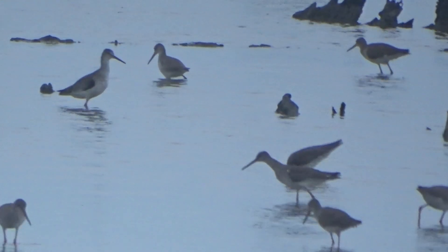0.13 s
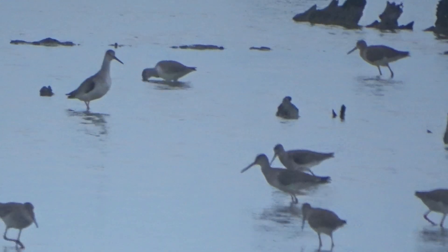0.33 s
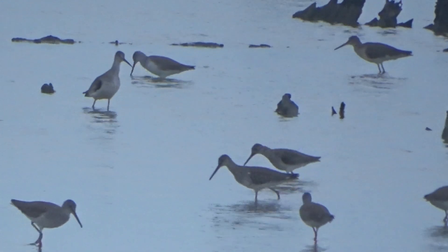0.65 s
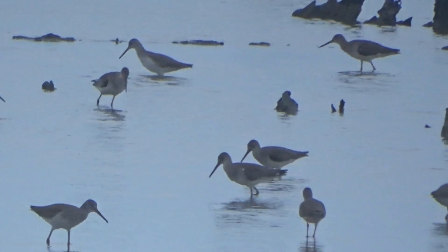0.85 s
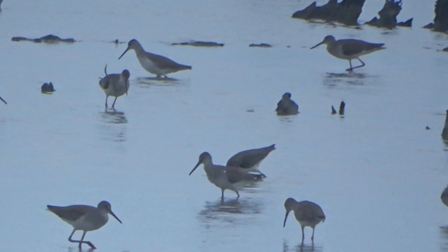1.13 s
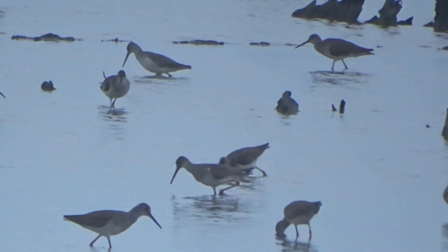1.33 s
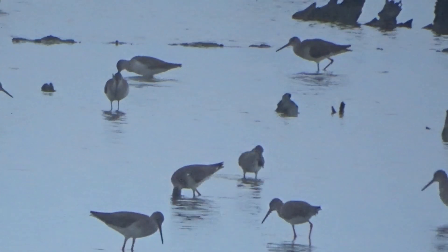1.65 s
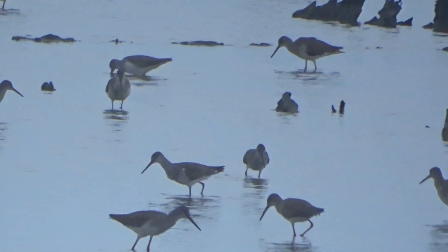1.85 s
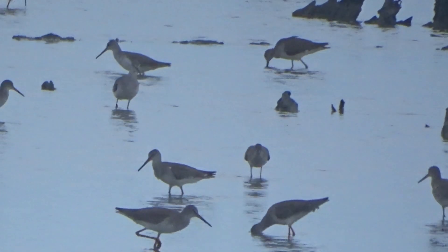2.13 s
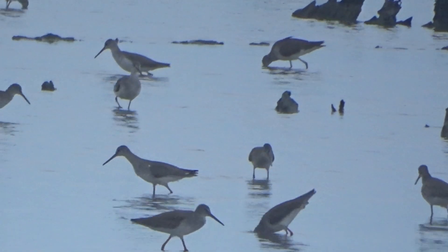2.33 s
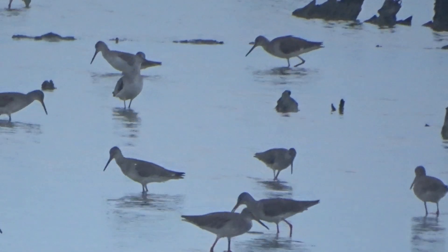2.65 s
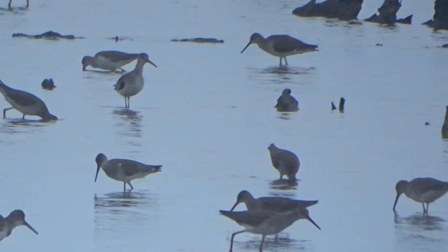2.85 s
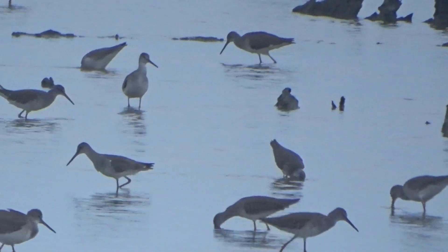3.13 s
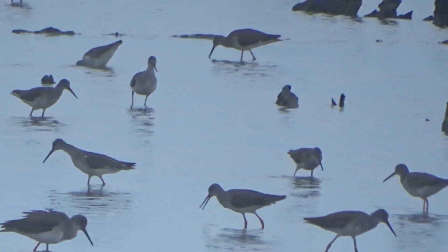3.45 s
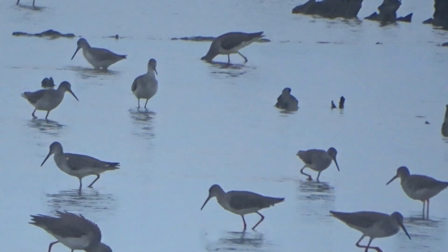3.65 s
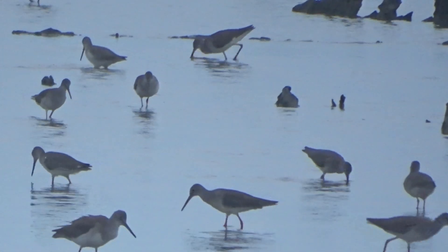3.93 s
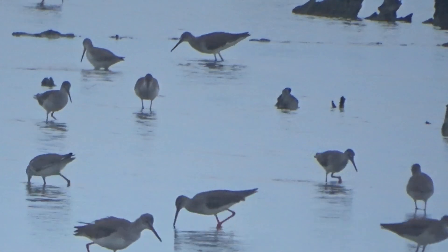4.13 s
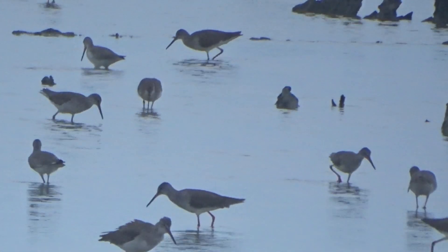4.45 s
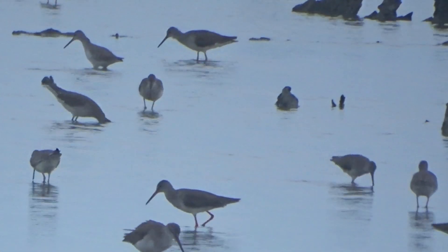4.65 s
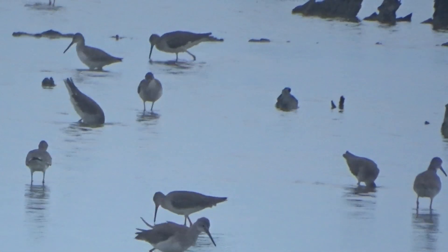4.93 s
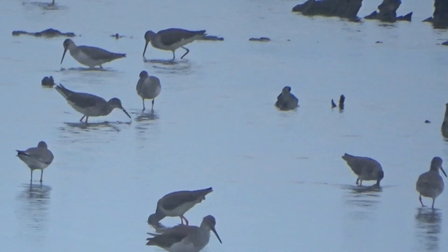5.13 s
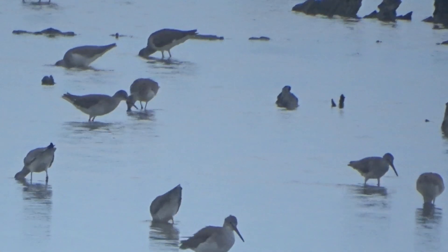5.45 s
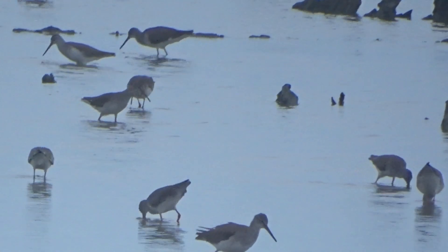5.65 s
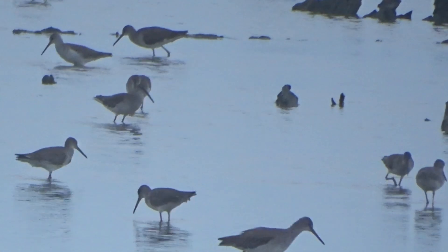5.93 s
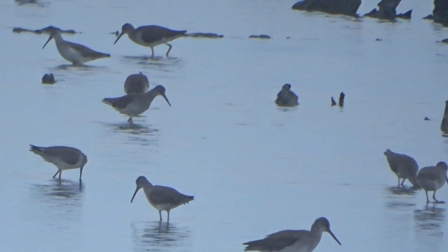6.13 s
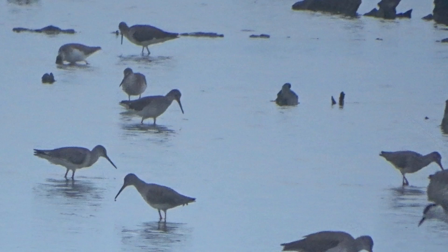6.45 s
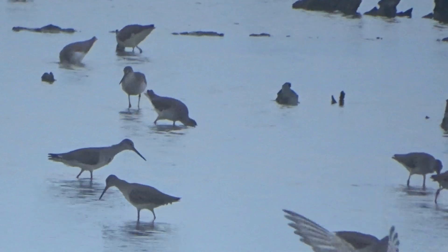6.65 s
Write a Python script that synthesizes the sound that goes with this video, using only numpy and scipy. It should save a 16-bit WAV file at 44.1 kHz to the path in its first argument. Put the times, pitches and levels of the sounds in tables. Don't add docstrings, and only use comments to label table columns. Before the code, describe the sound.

Shorebirds feed on a calm tidal flat, heard through a handheld camera with airy hiss, low wind rumble and a very faint high insect drone. From 0 s, soft far whistles mix with quick near trills and chirps around 3 kHz, slightly left. Bright plastic snaps strike at 0.4, 1.1-1.3 and 1.55 s, with rubbing between. A piping call and a falling whistle come at 1.0 s; harsh squeals at 1.5 and, strongest, 2.35-2.45 s. Piping repeats at 2.3 and 3.0 s, while a thin high song sweeps upward between 1.1 and 3.7 s. Wind eases near 3 s. A clear whistle drops at 4.35 s, another pipe sinks at 4.55 s amid clicks and knocks, as far trilling peaks. A bright trill comes around 5.05 s; after 5.6 s the chatter falls away, leaving sparse chirps, faint whistles and light rubbing until about 6.8 s.

```python
import sys
import numpy as np
from scipy import signal
from scipy.io import wavfile
from scipy.ndimage import uniform_filter1d

SR = 44100
rng = np.random.default_rng(int(sys.argv[2]) if len(sys.argv) > 2 else 0)


def to_wav(s):
    ch = np.atleast_2d(s).T
    pcm = np.round(np.clip(ch, -1, 1) * 32767)
    wavfile.write(sys.argv[1], SR, pcm.astype(np.int16))


def invert_db(level):
    return 10 ** (np.asarray(level, dtype=float) / 20)


N = 298998


def rms_one(x):
    return x / np.sqrt(np.mean(x ** 2) + 1e-20)


def in_time(rows):
    s, *columns = np.transpose(rows)
    return [np.interp(np.arange(N) / SR, s, column) for column in columns]


def at_hz(points, hz):
    point_hz, level_db = np.transpose(points)
    return np.interp(np.log(hz), np.log(point_hz), level_db)


def drift(rate_hz):
    r = np.exp(-2 * np.pi * rate_hz / SR)
    wander = signal.lfilter([1], [1, -2 * r, r * r], rng.standard_normal(N + SR))
    return rms_one(wander[SR:])


def pan(x, left_db):
    return x * invert_db(np.array([[.5], [-.5]]) * left_db)


def resonance(x, hz, width_hz):
    r = np.exp(-np.pi * width_hz / SR)
    zeros = np.array([1, 0, -1]) * (1 - r * r) / 2
    return signal.lfilter(zeros, [1, -2 * r * np.cos(2 * np.pi * hz / SR), r * r], x)


def band_20_70(x):
    return signal.sosfilt(signal.butter(2, [20, 70], "band", fs=SR, output="sos"), x)


def banded_noise(spectrum, patchy_db, alike_share):
    # f/Hz, likeness [0-1]
    likeness = [(60, 1), (200, 0.93), (500, 0.032), (2000, 0.44), (9000, 0.62)]
    out, edges = 0, np.geomspace(40, 13000, 22)
    edges = edges[edges > spectrum[0][0]]
    white, flicker = rng.standard_normal((2, 2, N)), drift(16.0)
    for k, (low, high) in enumerate(zip(edges, edges[1:])):
        band = signal.butter(2, [low, high], "band", fs=SR, output="sos")
        mid, side = signal.sosfilt(band, white[k % 2])
        hz = np.sqrt(low * high)
        alike = np.clip(max(at_hz(likeness, hz), alike_share), 0, 1)
        gain = invert_db(at_hz(spectrum, hz) + patchy_db * np.roll(flicker, k * SR // 3))
        out = out + gain * (np.sqrt(1 + alike) * mid + np.sqrt(1 - alike) * side * [[1], [-1]])
    return rms_one(out)


def open_flat(x):
    t = np.arange(int(.15 * SR)) / SR
    tails = rng.standard_normal((2, len(t))) * invert_db(-60 * t / 0.19) * (t > .004)
    tails = tails / np.sqrt(np.sum(tails ** 2) / 2)
    return signal.fftconvolve(x[None], tails, axes=1)[:, :N]


def add(out, s, pitch_hz, height, overtones, start):
    i = int(s * SR)
    phase = start + 2 * np.pi * np.cumsum(pitch_hz) / SR
    tone = np.sin(phase)
    for multiple, db in overtones:
        tone = tone + invert_db(db) * np.sin(round(4 * multiple) / 4 * phase)
    out[i:i + len(tone)] += (np.sqrt(2) * height * tone)[:N - i]


def bent(rows, arch=0, sag=0):
    notes = []
    for s, ms, first, last, db in rows:
        middle = (first + last) / 2 * (1 + arch) - sag * abs(last - first)
        notes.append((s, ms, first, middle, last, db))
    return notes


def glides(rows, overtones, edge, waver=0 * np.arange(N)):
    out, starts = np.zeros(N), rng.uniform(0, 2 * np.pi, len(rows))
    for (s, ms, first, middle, last, level_db), start in zip(rows, starts):
        u = np.linspace(-1, 1, int(ms * SR / 1000))
        pitch = middle + (last - first) / 2 * u + ((first + last) / 2 - middle) * u ** 2
        shake = waver.take(int(s * SR) + np.arange(len(u)), mode="wrap")
        swell = signal.windows.tukey(len(u), np.clip(edge, 0, 1))
        add(out, s, pitch * (1 + shake), invert_db(level_db) * swell, overtones, start)
    return out


def trill(rows, rise_ms, fall_ms, tail_db):
    out = np.zeros(N)
    ms = np.arange(-rise_ms, fall_ms + 16, 1000 / SR)
    rise = np.cos(np.pi / 2 * ms / rise_ms)
    fall = np.cos(np.pi / 2 * np.minimum(ms / fall_ms, 1)) ** 2
    swell = np.where(ms < 0, rise, fall)
    slack = np.maximum(ms - 0.61 * fall_ms, 0)
    tail = invert_db(tail_db) * np.sin(np.pi * slack / slack[-1])
    for (s, hz, slope, db), (start, depth) in zip(rows, rng.random((len(rows), 2))):
        tense = np.clip((hz - 3150) / 400, .4, 1)
        pitch = hz + slope * (ms - slack) - (15 + 25 * depth) * slack
        height = invert_db(db) * (swell + tail * depth * tense)
        add(out, s - rise_ms / 1000, pitch, height, [(2, -28)], 2 * np.pi * start)
    return out


def far_whistles():
    # t/s, length/ms, start f/Hz, end f/Hz, level/dB
    arched = [(0, 30, 1850, 1600, -53), (0.015, 52, 2400, 2130, -50.5), (0.085, 35, 2950, 2750, -60),
              (0.1, 104, 1740, 1600, -52.5), (0.205, 38, 2480, 2220, -61), (0.31, 25, 2430, 2220, -59),
              (0.452, 64, 1600, 1580, -57.5), (0.49, 24, 2450, 2350, -57), (0.645, 100, 1520, 1540, -63),
              (0.755, 110, 1500, 1440, -65), (1.3, 80, 1480, 1470, -61), (1.41, 120, 1430, 1470, -60),
              (1.53, 110, 1450, 1440, -60), (1.7, 110, 1420, 1460, -61), (1.82, 140, 1460, 1470, -59),
              (1.96, 50, 1720, 1680, -62), (2.07, 95, 1450, 1530, -59), (2.07, 90, 2220, 2180, -63),
              (2.175, 95, 1480, 1420, -60), (2.18, 85, 1280, 1150, -65), (2.435, 140, 1360, 1450, -61),
              (2.68, 38, 1480, 1400, -65), (2.74, 120, 1350, 1460, -63), (2.765, 215, 1880, 1700, -62),
              (3.33, 90, 1130, 1130, -67), (3.355, 90, 1600, 1450, -61), (3.5, 85, 1380, 1400, -61),
               (3.52, 60, 1150, 1130, -68), (3.65, 50, 1520, 1550, -63), (3.655, 40, 2320, 2200, -64),
               (3.74, 80, 1450, 1700, -63), (4.05, 90, 1500, 1450, -64), (5.64, 40, 1760, 1660, -67),
               (5.78, 36, 1080, 1130, -64), (5.83, 70, 1980, 2200, -70), (5.865, 20, 1120, 1120, -67),
               (5.9, 30, 1090, 1110, -65), (5.99, 92, 1720, 1690, -66), (6.02, 55, 3420, 3380, -71),
               (6.06, 130, 1450, 1480, -67), (6.112, 112, 1085, 1080, -64), (6.18, 30, 2900, 3120, -65),
               (6.2, 55, 2050, 1830, -68), (6.22, 35, 2880, 2950, -66), (6.26, 40, 1680, 1660, -68),
               (6.32, 140, 1680, 1560, -67), (6.365, 115, 1085, 1080, -64), (6.51, 75, 3200, 3380, -68),
               (6.52, 90, 1480, 1440, -67), (6.625, 100, 2950, 3230, -64), (6.71, 30, 2650, 2850, -66)]
    # t/s, length/ms, start f/Hz, end f/Hz, level/dB
    sagging = [
        (1.655, 147, 3080, 3153, -52.5),
        (1.795, 71, 3180, 2220, -58.5),
        (1.858, 104, 3360, 3280, -51),
        (2.72, 40, 2640, 2300, -58),
        (4.485, 79, 2526, 2395, -48),
        (5.948, 29, 3500, 3660, -56.5),
        (5.97, 29, 3400, 2670, -51),
        (6.0, 25, 2610, 3230, -52),
    ]
    repeats = [(5.17 + .19 * k, 72, 1790, 1850, -66) for k in range(4)]
    notes = bent(arched + repeats, arch=0.0397) + bent(sagging, sag=0.236)
    return glides(notes, [], .35, waver=.008 * drift(50.0)) * invert_db(1.5 * drift(40.0))


def far_flock(count, low_hz, high_hz, ms):
    s, p, size, place = rng.random((count, 4)).T
    hz = low_hz + (high_hz - low_hz) * p ** 2
    rows = np.transpose([s * (N / SR), ms * (.5 + size), .95 * hz, hz, 0.913 * hz, 2.6 * size])
    waver = .012 * drift(70.0)
    left = glides(rows[place < .5], [], .8, waver)
    middle = glides(rows[place >= .5], [], .8, waver)
    return rms_one(pan(left, 15.0) + middle + invert_db(0.5) * open_flat(left + middle))


def far_trills(count, low_hz, high_hz):
    s, p, size, pace = rng.random((count, 4)).T
    beats = np.arange(3)[:, None]
    s = (np.arange(count) + s) / count
    at = .02 + (s * (N / SR) + beats * (.026 + 0.014 * pace)) % (N / SR - .05)
    hz = low_hz + (high_hz - low_hz) * p - 60.0 * beats
    rows = np.stack(np.broadcast_arrays(at, hz, -8.0 - 40.0 * pace, 8.0 * size), -1)
    chatter = trill(rows.reshape(-1, 4), rise_ms=4.4, fall_ms=12.1, tail_db=-7.0)
    return rms_one(pan(chatter, 4.3) + invert_db(-5.5) * open_flat(chatter))


def wind(gust_db):
    gusts = band_20_70(rng.standard_normal((2, N)) + 1.2 * rng.standard_normal(N))
    return invert_db(gust_db - 5.5 + 4.5 * drift(7.0)) * rms_one(gusts)


def insects():
    noise = rng.standard_normal((2, N))
    return invert_db(-81.0) * rms_one(resonance(resonance(noise, 6560, 440), 6560, 440))


def air():
    # f/Hz, level/dB per Hz
    air_spectrum = [(35, -37), (60, 1.5), (192, -1), (256, -12.5), (452, -12), (818, -25), (1510, -17.5),
                    (2200, -29), (3050, -14), (4340, -35), (6580, -28), (10400, -37.5), (11400, -31),
                    (14800, -75), (22000, -120)]
    return invert_db(-53.5) * pan(banded_noise(air_spectrum, patchy_db=2.5, alike_share=0), .8)


def strokes(rows):
    out = np.zeros(N)
    for s, ms, db in rows:
        i, n = max(int((s - ms / 8000) * SR), 0), int(ms * SR / 800)
        out[i:i + n] += invert_db(db) * signal.windows.tukey(n, .55)[:N - i]
    return out


def rustle():
    # t/s, length/ms, level/dB
    rubbing = [(0, 77, -53.5), (0.1, 560, -63.5), (0.4, 41, -47), (0.47, 98, -48), (0.85, 100, -53),
               (0.94, 84, -56), (1.05, 460, -53), (1.58, 71, -52), (1.69, 51, -53.5), (1.82, 170, -61),
               (2.165, 37, -44.5), (3.06, 35, -53.5), (3.33, 110, -57), (3.52, 110, -54.5),
               (3.73, 76, -60.5), (3.94, 132, -55), (4.13, 64, -59), (4.54, 184, -53), (6.27, 200, -55),
               (6.58, 110, -67)]
    # f/Hz, level/dB per Hz
    rub_spectrum = [(2000, -2), (4000, 0), (7000, 7), (9500, 5.5), (11500, 2.5)]
    noise = banded_noise([(1000, -31)] + rub_spectrum, patchy_db=2.0, alike_share=0.86)
    return strokes(rubbing) * noise * invert_db(2.0 * drift(25.0) - 3.5)


def run_notes(runs, beat_s, glide):
    notes = []
    for first, last, first_hz, last_hz, db in runs:
        count = round((last - first) / beat_s) + 1
        bend, size = rng.standard_normal((count, 2)).T
        times = np.linspace(first, last, count)
        pitches = np.linspace(first_hz, last_hz, count)
        notes += zip(times, pitches, glide + 5.0 * bend, db + 2.0 * size)
    return notes


def near_trills():
    # first note t/s, last note t/s, first f/Hz, last f/Hz, level/dB
    quick = [(.017, .046, 3500, 3400, -43), (.947, 1.028, 3710, 3680, -49), (1.066, 1.18, 3570, 3470, -50),
             (2.048, 2.079, 2900, 3100, -51.5), (2.66, 2.798, 3530, 3660, -52.5),
             (2.897, 2.978, 3720, 3570, -48), (3.174, 3.234, 3640, 3640, -44),
             (3.38, 3.454, 3730, 3640, -45), (3.485, 3.512, 3570, 3550, -47),
             (3.533, 3.553, 3260, 3190, -45), (3.688, 3.767, 3526, 3610, -48.5),
             (3.801, 3.829, 3650, 3450, -52), (4.195, 4.222, 3560, 3650, -49),
             (4.418, 4.503, 3520, 3550, -51), (5.04, 5.096, 3710, 3530, -43.5)]
    steady = [(1.375, 1.48, 3529, 3520, -46.5), (1.34, 1.445, 3250, 3310, -50.5),
              (1.775, 1.91, 3610, 3530, -49), (1.633, 1.76, 3030, 3173, -44.5),
              (2.111, 2.209, 2820, 2930, -51), (2.117, 2.192, 3600, 3470, -50.5),
              (2.594, 2.629, 3720, 3730, -46), (3.045, 3.244, 3140, 3225, -46.5),
              (4.053, 4.088, 3220, 3110, -50), (4.438, 4.503, 3160, 3120, -46.5),
              (4.566, 4.666, 3110, 2960, -50.5), (4.726, 4.795, 3300, 3200, -63)]
    slow = [
        (1.847, 1.93, 3180, 3170, -57),
        (2.978, 3.024, 3300, 3670, -46.5),
        (3.432, 3.474, 3050, 3220, -49),
        (5.16, 5.36, 3240, 3110, -49),
        (5.4, 5.485, 2960, 2770, -59),
        (6.5, 6.62, 2990, 3120, -56),
        (6.702, 6.745, 3130, 3220, -54.5),
    ]
    # loudest moment t/s, f/Hz, glide/Hz per ms, level/dB
    chirps = [(0.293, 3280, -16, -51), (0.38, 3400, -20, -49.5), (0.507, 3310, -13, -43.5),
              (0.571, 3330, -39, -47), (0.636, 3220, -37, -47.5), (0.702, 3370, -21, -49),
              (0.785, 3250, -54, -50), (1.104, 3420, -1, -47), (1.265, 3440, 4, -47),
              (1.304, 3070, -47, -46.5), (1.589, 3130, -32, -41.5), (1.803, 3150, -28, -48),
              (1.963, 3070, 31, -45.5), (2.249, 3540, -2, -46.5), (2.307, 3520, -17, -46.5),
              (2.658, 3290, -37, -45), (2.889, 3190, -26, -45), (3.322, 3170, -7, -42),
              (3.603, 3080, 20, -47), (4.166, 3120, 5, -46.5), (4.25, 3280, 8, -45),
              (4.306, 3160, -11, -48.5), (4.902, 3270, -3, -47), (4.998, 3590, 2, -42.5),
              (5.113, 3045, -23, -46), (5.647, 3130, 7, -53), (5.84, 3300, -33, -58),
              (5.915, 3090, -15, -54.5), (6.137, 3060, -15, -51.5), (6.467, 3620, -22, -58.5),
              (0.115, 3480, -49, -57), (0.143, 3350, -35, -53), (0.2, 3300, -42, -58),
                   (0.459, 3190, -23, -46.5), (0.556, 3320, -4, -50), (0.611, 3270, -4, -51),
                   (0.66, 3240, -16, -51), (1.2, 3600, -19, -49), (1.315, 3720, 0, -56),
                   (1.514, 3260, -30, -43), (2.854, 3350, -31, -52), (4.835, 3310, -42, -59),
                   (4.959, 3100, -27, -55), (4.982, 3470, 5, -52), (5.004, 3090, -29, -48),
                   (5.51, 3170, -41, -62), (5.575, 2900, -23, -57), (5.853, 3120, -35, -58),
                   (6.021, 3070, -37, -55), (6.31, 2820, -50, -64), (6.38, 2850, -30, -58),
                   (6.446, 2950, -40, -58), (6.68, 3250, -33, -67)]
    crisp = chirps
    crisp = crisp + run_notes(quick, beat_s=.028, glide=-6.0) + run_notes(slow, beat_s=.041, glide=-24.0)
    drawn = run_notes(steady, beat_s=.034, glide=-7.0)
    crisp_trill = trill(crisp, rise_ms=6.0, fall_ms=15.0, tail_db=-6.0)
    return crisp_trill + trill(drawn, rise_ms=8.0, fall_ms=21.0, tail_db=-9.0)


def camera_clicks():
    # t/s, peak level/dB, low knock level/dB
    snaps = [(0.1711, -33, -6), (0.2662, -32, -6.5), (0.326, -26.5, -7.5), (0.357, -39, 6),
             (0.423, -13.5, -24), (0.4357, -13, -19.5), (0.61, -30, -6), (0.738, -39, 1.5),
             (0.819, -32.5, -9), (1.091, -13, -40), (1.1518, -20, -13.5), (1.203, -16.5, -17),
             (1.26, -17.5, -9), (1.552, -12, -32), (1.7279, -29, -7), (2.1626, -20, 0),
             (3.0396, -23.5, -24), (3.3347, -25, -7), (3.38, -22.5, -36), (3.928, -20.5, 2.5),
             (4.5352, -13.5, -1.5), (4.5458, -17.5, -14), (4.566, -27, -1), (4.6186, -13, -26),
             (4.6628, -39, 7), (4.7248, -28, -15), (5.069, -32, -1.5), (5.5977, -34, -2),
             (0.157, -34, -20), (0.367, -30, -18), (0.385, -31, -20), (0.691, -38, -20),
              (0.797, -34.5, -15), (1.06, -31, -25), (1.236, -28, -10), (1.243, -32, -10), (1.64, -36, -15),
              (1.70, -29, -15), (3.048, -34, -22), (3.348, -34, -27), (3.397, -25, -32), (3.85, -44, -11),
              (3.952, -28, -25), (4.529, -26, -25), (4.6153, -27, -25), (4.697, -35, -1), (4.739, -28, -20),
              (5.735, -38, -10), (6.766, -41.5, 1)]
    # f/Hz, width/Hz, level/dB
    body_modes = [(286, 240, -3), (630, 420, -3), (1990, 2700, 1.5), (4070, 1300, -31)]
    events = snaps
    bright, knock = np.zeros(N), np.zeros(N)
    t = np.arange(600) / SR
    for (s, peak_db, knock_db), noise in zip(events, rng.standard_normal((len(events), 600))):
        decay = 0.00038 * invert_db(0.54 * (peak_db + knock_db + 50.0))
        fade_s = max(decay, .0003)
        burst = noise * np.abs(noise) * np.exp(-t / fade_s) * np.minimum(t / decay * 2, 1)
        burst = burst * invert_db(peak_db) * np.sqrt(fade_s * SR * .2 / np.sum(burst ** 2))
        i = int(s * SR)
        bright[i:i + 600] += burst
        knock[i:i + 600] += burst * invert_db(knock_db + 2.5)
    body = sum(invert_db(db) * resonance(knock, hz, width) for hz, width, db in body_modes)
    return resonance(bright, 7550, 4400) + body


def piping():
    # t/s, length/ms, top f/Hz, end f/Hz, level/dB
    pipes = [
        (1.012, 160, 1940, 1890, -47),
        (2.268, 220, 1995, 1796, -48),
        (2.978, 270, 2060, 1758, -47),
        (4.533, 265, 1990, 1719, -46),
    ]
    # multiple of the pitch, level/dB
    pipe_overtones = [(2, -7), (3, -25), (4, -22)]
    out = np.zeros(N)
    for s, ms, top, end, db in pipes:
        t = np.arange(0, ms, 1000 / SR)
        path_hz = [.86 * top, 1.02 * top, top - 0.43 * (top - end), end + 30, end - 40]
        pitch = np.interp(t, [0, 22, 55, ms - 25, ms], path_hz)
        swell_db = np.interp(t, [0, 8, 60, ms - 30, ms], [-30, -10.5, -1, -4, -11])
        fading = [(k, rel - 5 * t / ms + 3 * (k - 1) * np.exp(-t / 35)) for k, rel in pipe_overtones]
        add(out, s, uniform_filter1d(pitch, size=300), invert_db(db + swell_db), fading, 0)
    return out


def falling_calls():
    # t/s, f/Hz, level/dB
    falls = [
        [(1.045, 2610, -45.5), (1.095, 2256, -58.5), (1.29, 2120, -58)],
        [(4.342, 2730, -42.5), (4.368, 2345, -43.5), (4.447, 2180, -50)],
    ]
    out = np.zeros(N)
    for rows in falls:
        s, hz, db = np.transpose(rows)
        t = np.arange(s[0], s[-1], 1 / SR)
        height = invert_db(np.interp(t, s, db)) * signal.windows.tukey(len(t), .08)
        add(out, s[0], np.interp(t, s, hz), height, [], 0)
    return out


def thin_song():
    # t/s, length/ms, start f/Hz, end f/Hz, level/dB
    song_notes = [(1.13, 41, 6300, 6000, -57), (1.37, 14, 5400, 4600, -61), (1.4, 21, 5300, 4850, -59),
                  (1.438, 34, 5300, 4800, -59), (1.49, 57, 4800, 5050, -59), (1.755, 35, 4950, 4650, -64),
                  (1.795, 110, 4980, 6560, -59), (1.92, 16, 5730, 4930, -61), (1.96, 24, 5000, 4800, -55),
                  (2.005, 32, 4940, 4520, -59), (2.045, 130, 4760, 5900, -60), (2.495, 20, 5030, 4650, -58),
                  (2.535, 43, 5350, 5150, -57), (2.585, 30, 4800, 4500, -64), (2.61, 105, 4640, 6400, -61),
                  (2.74, 26, 5000, 4600, -64), (2.782, 22, 5200, 4650, -64), (2.825, 28, 5000, 4460, -65),
                  (2.87, 28, 4900, 4540, -65), (2.91, 100, 4540, 6400, -60.5), (2.985, 37, 6940, 6800, -62),
                  (3.165, 30, 4850, 4600, -65), (3.21, 76, 4730, 6760, -59), (3.47, 50, 5250, 5270, -55),
                  (3.525, 90, 4700, 6500, -65), (3.66, 28, 7000, 5400, -61), (5.16, 43, 6700, 5570, -67.5),
                  (5.322, 12, 5440, 4760, -61)]
    voice = glides(bent(song_notes, sag=.4), [], 0.075, waver=0.0097 * drift(60.0))
    return voice * invert_db(-7 + 1.9 * drift(64.0))


def squeals():
    # t/s, length/ms, start f/Hz, end f/Hz, level/dB
    squeal_notes = [
        (1.53, 72, 4400, 4300, -41.5),
        (1.54, 54, 5750, 5620, -54),
        (2.348, 40, 4300, 4380, -40),
        (2.375, 33.6, 5320, 5170, -41),
        (2.395, 35, 4080, 3770, -38),
        (2.42, 71, 3690, 3400, -48.5),
        (2.44, 30, 4950, 5000, -55),
    ]
    partials = [(1.25, -18), (1.5, -24.5), (2, -16)]
    voice = glides(bent(squeal_notes, arch=0.0316), partials, .3, waver=.012 * drift(450.0))
    voice = voice * invert_db(4.5 * drift(200.0))
    effort = signal.lfilter([.003], [1, -.997], np.abs(voice))
    breath = resonance(resonance(rng.standard_normal(N), 3400, 4500), 3500, 4900)
    return voice + invert_db(0.5) * effort * breath


def scene():
    # t/s, far trilling level/dB, far whistling level/dB, wind gust level/dB
    background = [
        (0, -59, -58.5, -54.5),
        (.8, -59.5, -68.5, -49),
        (1.4, -53.5, -62, -62),
        (2.4, -56, -64.5, -63),
        (2.9, -61.5, -67, -79),
        (3.6, -55.5, -68.5, -55.5),
        (4.5, -51, -64, -48.5),
        (5.1, -54.5, -65.5, -49.5),
        (5.6, -80, -69.5, -53.5),
        (6.78, -71, -71.5, -62),
    ]
    trilling_db, whistling_db, gust_db = in_time(background)
    whistles, near = far_whistles(), near_trills()
    calls = (piping() + falling_calls()) * invert_db(1.8 * drift(25.0))
    song, harsh = thin_song(), squeals()
    birds = pan(near, 4.8) + pan(calls, 0.51) + pan(whistles, 3.6) + pan(song, 1.3) + pan(harsh, 1.6)
    birds += invert_db(-12) * open_flat(near + calls + whistles + song + harsh)
    birds += invert_db(trilling_db) * far_trills(count=160, low_hz=2850, high_hz=3500)
    birds += invert_db(whistling_db) * far_flock(count=300, low_hz=1420, high_hz=1800, ms=80)
    return birds + insects() + camera_clicks() + rustle() + wind(gust_db) + air()


def roll_off(x):
    return signal.sosfilt(signal.butter(12, 11550, fs=SR, output="sos"), x)


def record(dry):
    steep_cut = signal.cheby2(10, 32, 11520, fs=SR, output="sos")
    mix = signal.sosfilt(steep_cut, dry)
    return roll_off(mix)


dry = scene()
out = record(dry)
to_wav(out)
```